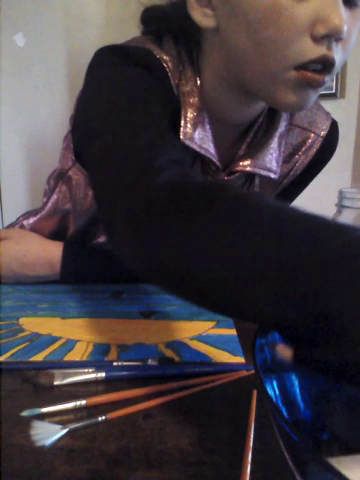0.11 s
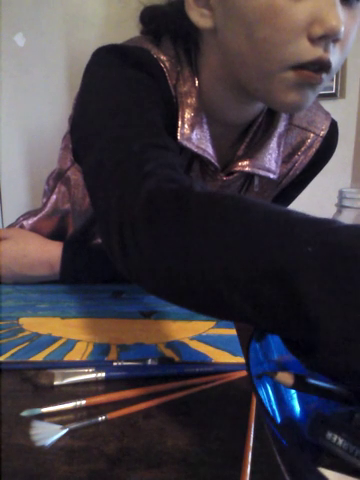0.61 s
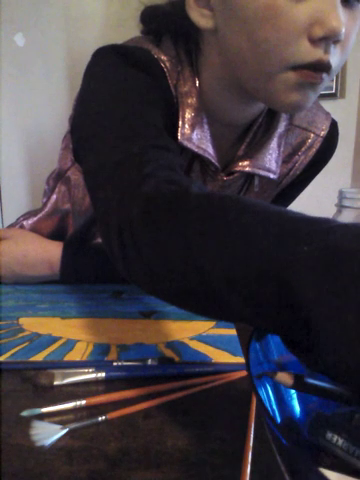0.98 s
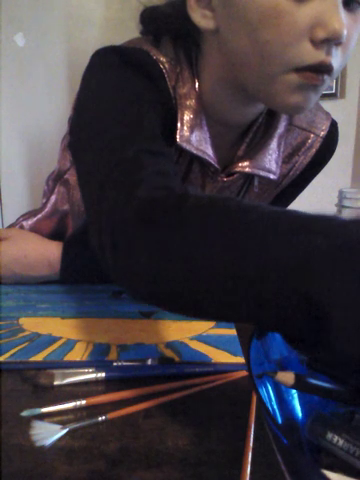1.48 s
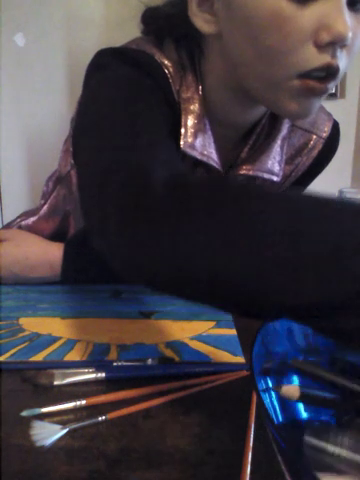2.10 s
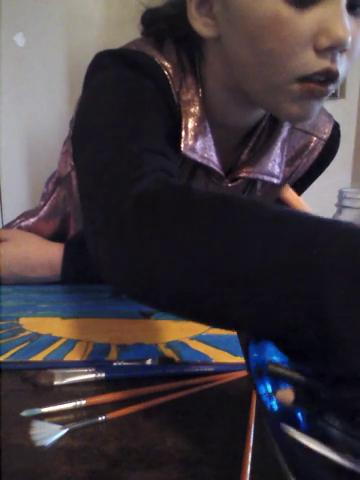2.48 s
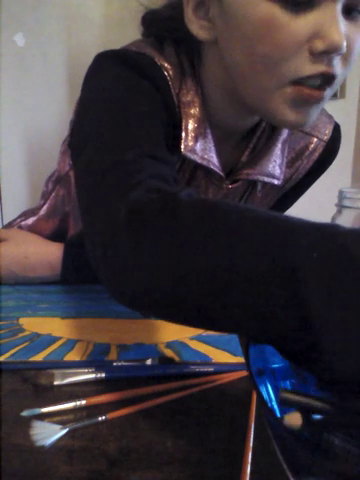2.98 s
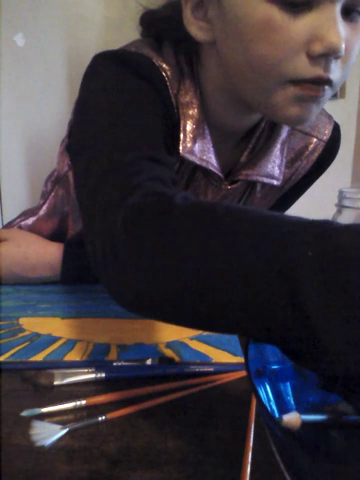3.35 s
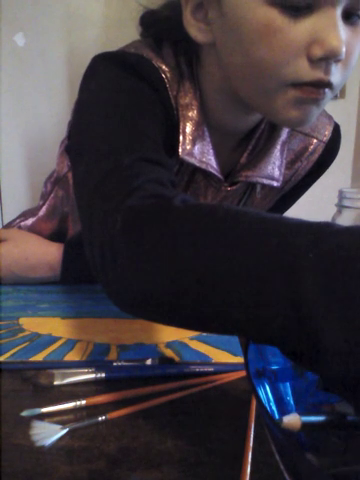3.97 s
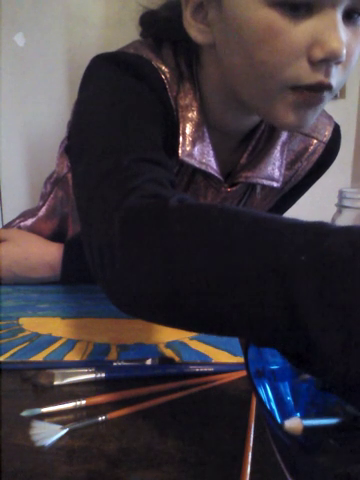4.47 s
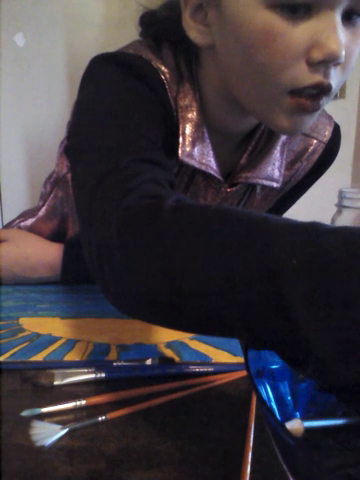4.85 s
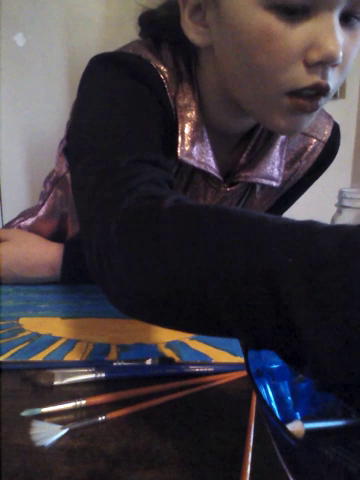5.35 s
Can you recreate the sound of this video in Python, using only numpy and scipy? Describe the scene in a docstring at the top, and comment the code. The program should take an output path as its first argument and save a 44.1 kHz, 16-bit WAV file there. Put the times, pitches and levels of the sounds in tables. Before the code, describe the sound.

A hand rummages through paintbrushes in a plastic case on a table, handles rattling and clacking, then thinning to scattered taps.

```python
"""Paintbrush handles clack, roll and scrape as a hand rummages through a plastic case on a wooden table.
Each impact excites the bending modes of the handles and the resonances of the hollow case;
now and then a single brush rings as a free bar. The case is shoved over the table, an arm bumps softly
on it and a sleeve slides past, all close to a small microphone in a quiet room."""
import sys
import numpy as np
from scipy import signal
from scipy.fft import rfft, irfft, next_fast_len
from scipy.io import wavfile
from scipy.ndimage import uniform_filter1d, map_coordinates

SR = 44100
rng = np.random.default_rng(int(sys.argv[2]) if len(sys.argv) > 2 else 0)


def to_wav(sig):
    """Store sig (one row per channel, or 1-D mono) as 16-bit WAV at the path in sys.argv[1].

    Samples outside -1..1 are clipped; the rate is SR.
    """
    pcm = np.clip(np.atleast_2d(sig), -1, 1) * 32767
    pcm = np.round(pcm).astype(np.int16)
    wavfile.write(sys.argv[1], SR, pcm.T)  # frames by channels


N = 244755

# handles striking the case: t/s, level/dB, hardness (-3 soft, 0 ordinary, 5 sharp)
HANDLE_IMPACTS = [(.031, -22, 0.7), (0.045, -27.5, 0), (.078, -23, -.5), (.114, -20.5, 3),
                  (.289, -19.5, -3.5), (.307, -19.5, 1), (.34, -23.5, 3), (0.358, -22, 0),
                  (0.38, -18, -1.1), (.459, -15, 1), (.468, -21, -0.5), (.541, -25, -.5), (.585, -29, -1),
                  (.705, -41, -1), (1.725, -42.5, 2.5), (1.815, -38, -1.5), (1.86, -38, -2),
                  (1.913, -18, -2), (1.929, -22, 1), (1.979, -21, -.5), (2.028, -21.5, 1.5),
                  (2.044, -17, 1), (2.072, -24, 2.5), (2.097, -18, -2), (2.12, -19.5, -2),
                  (2.177, -23.5, 4.5), (2.24, -20.5, 1), (2.279, -20.5, 1.5), (2.31, -25, 5),
                  (2.346, -20, 1.5), (2.445, -23, 1), (2.508, -16.5, 1), (2.603, -21.5, 0),
                  (2.651, -26.5, -0.5), (2.673, -20.5, 1), (2.836, -27, 1.5), (2.842, -16, 0),
                  (3.02, -38.5, -3), (3.12, -46, -1), (3.22, -49.5, -1), (3.256, -28, 0),
                  (3.441, -31.5, -.5), (3.481, -26, 1), (3.581, -47, -2.5), (4.09, -59.5, -0.5),
                  (4.11, -65.5, 0), (4.182, -29, 2.5), (4.246, -30, 4), (4.262, -24.5, 1), (4.27, -18, -.5),
                  (4.278, -22, 4), (4.357, -41, -1), (4.503, -58, 1.5), (4.618, -29, 2.2),
                  (4.867, -64.5, -1.5), (5.182, -63, 6.5), (5.325, -61.5, 5.5), (5.262, -50.5, -1.5),
                  (5.365, -47.5, 4), (5.463, -39, 1.5), (5.5, -43, -2.5), (5.522, -47.5, 2)]
# table knock, case body, wood snap, ferrule click: level/dB, gain per hardness step/dB, buzz time/s
IMPACT_BANDS = [(-10.5, -3.5, .012), (1.5, -0.56, .01), (-2, 0.5, 0.0091), (-12, 3, 0.0029)]
# edges of those four bands: f/Hz
IMPACT_BAND_EDGES = [95, 800, 2200, 5500, 18000]
# spectrum of handles on plastic: f/Hz, level/dB
CLATTER_SPECTRUM = [(50, -39.5), (125, -14.5), (250, -0.5), (370, -4.5), (520, 4), (800, -3.5), (1150, 2.5),
                    (1600, 5.5), (2900, -1.5), (4700, -11), (5900, -20.5), (7000, -13), (9000, -25),
                    (16000, -41.5)]
# resonances of the hollow case and table: f/Hz, level/dB
CASE_MODES = [(105, -7.5), (135, -3), (174, -23.5), (216, -18), (523, -9.5), (575, -2), (745, -29),
              (1060, 2), (1135, 1), (1447, -6.5), (1547, 7), (1700, 4), (2690, -12), (3000, -5.5),
              (3520, -7.5), (4822, -15)]
# strokes of the hand through the handles: t/s, duration/s, effort level/dB
HAND_STROKES = [(0, 0.015, -21.5), (.02, 0.026, -19.5), (.1, 0.11, -27), (.22, 0.052, -19.5),
                (.28, .12, -13.5), (.46, .05, -21.5), (1.72, 0.034, -30), (1.78, 0.024, -42.5),
                (1.898, 0.03, -33.5), (1.915, 0.035, -17.5), (2.01, 0.049, -17), (2.185, .18, -15.5),
                (2.44, .13, -22), (2.67, .04, -28.5), (2.74, .04, -33), (3.24, 0.032, -41),
                (3.425, 0.049, -33), (4.18, 0.0066, -21.5), (4.265, 0.014, -30), (4.45, 0.34, -67.5),
                (5.26, 0.17, -60), (5.44, 0.031, -43)]
# one handle ringing freely: t/s, peak level/dB, frequency ratio to BAR_MODES, tilt/(dB per octave)
HANDLE_PINGS = [(3.282, -26, 1, 2), (3.343, -16.5, 1, 2), (4.245, -11, 1.85, -12)]
# bending modes of that handle: f/Hz, level/dB, T60/s
BAR_MODES = [(2500, 6.5, 0.042), (4640, 2, 0.036), (5390, -8, 0.026), (7200, 1.5, 0.023)]
# soft bumps on case and table: t/s, peak level/dB, f/Hz
SOFT_BUMPS = [(0.332, -3, 514.5), (2.177, -2, 922), (2.324, -19, 131), (2.565, -9, 193), (2.584, -12, 228),
              (2.61, -10, 192.3), (2.943, -19, 514), (3.017, -27.5, 204), (3.407, -15.5, 528),
              (4.68, -43.5, 272.3), (4.945, -44.5, 186.2), (5.441, -32, 604)]
# the case dragging on the table: t/s, duration/s, level/dB
CASE_SHOVES = [(2.24, 0.079, -22.5)]
# spectrum of that drag: f/Hz, level/dB
DRAG_SPECTRUM = [(20, -8.5), (42, -1.5), (60, -8), (105, 3), (140, -1.5), (300, 2.5), (700, -46.5),
                 (2000, -120)]
# the sleeve sliding: t/s, duration/s, level/dB
SLEEVE_SLIDES = [(2.79, .27, -32.5)]
# spectrum of rubbing cloth: f/Hz, level/dB
CLOTH_SPECTRUM = [(59, -27), (100, -14), (135, 0.5), (255, 4.5), (398, -5), (547, -15), (705, -6.5),
                  (1760, -11), (2580, -16), (6150, -16.5), (6990, -3), (16000, -39)]
# reverberation time of the room: f/Hz, T60/s
ROOM_DECAY = [(120, 0.26), (400, 0.27), (2000, 0.17), (12000, 0.14)]
# still room and microphone hiss: f/Hz, level/dB
AIR_SPECTRUM = [(25, -2), (90, -2), (345, -6.5), (680, -7), (1140, -11.5), (5600, -18.5), (6950, -11.5),
                (8500, -16), (16000, -21.5)]


def clacks():
    """Impact excitation: a soft blow favours the low table knock, a hard one the snap and click."""
    out, t = np.zeros(N), np.arange(SR // 7) / SR
    edges = zip(IMPACT_BAND_EDGES, IMPACT_BAND_EDGES[1:])
    bands = [signal.butter(4, pair, "band", fs=SR, output="sos") for pair in edges]
    attack = round(.025 * SR)  # the first 25 ms set each band's level
    for start, db, hardness in HANDLE_IMPACTS:
        for band, (band_db, step_db, buzz_s) in zip(bands, IMPACT_BANDS):
            part = signal.sosfilt(band, impact(t, buzz_s))
            add(out, start, amp(db + band_db + step_db * hardness) * part / np.std(part[:attack]))
    return out


def impact(t, buzz_s, rise_s=0.0019, handle_t60=0.019, handle_db=-3, case_db=-9, chatter_db=-23):
    """Transient response: the handles buzz together, their modes die quickly and the case rings on."""
    chatter = amp(chatter_db) * fade(t, t60=.2)
    crack = rng.standard_normal(len(t)) * (np.exp(-(t / buzz_s) ** 2) + chatter)
    wood = ring(handle_modes(handle_t60) + handle_modes(handle_t60), t, scatter_db=3)  # two handles
    blow = shaped(crack / np.linalg.norm(crack) + amp(handle_db) * wood, CLATTER_SPECTRUM)
    onset = 1 - np.exp(-t / rise_s)  # the blow spreads through the bunch
    return (blow / np.linalg.norm(blow) + amp(case_db) * case_ring(t)) * onset


def handle_modes(t60):
    """Bending of a free bar: frequencies go as (2k + 1) squared, from a pitch set by its random length."""
    first_hz = rng.uniform(300, 800)
    return [(first_hz * ((2 * k + 1) / 3) ** 2, 0, t60) for k in range(1, 7)]


def case_ring(t, low_t60=0.1, damping_exponent=0.043, grip_detune=.012):
    """Damped resonance: the case's higher modes die sooner; the changing grip detunes them a little."""
    lowest_hz = CASE_MODES[0][0]
    modes = [(hz * (1 + grip_detune * rng.standard_normal()), db,
              low_t60 * (lowest_hz / hz) ** damping_exponent) for hz, db in CASE_MODES]
    return ring(modes, t, scatter_db=5.5)


def stirring(effort, case_db=-8, clump_db=2, clumps_per_s=130, tick_db=-23):
    """Sliding friction: handles slip in clumps of tiny contacts that shake the case; ferrules tick."""
    contacts = grains(per_s=5000, spread_db=2.5)
    clumping = amp(clump_db * wobble(clumps_per_s * N / SR, N))
    slips = unit(contacts * clumping) * effort
    scrape = shifting_colour(shaped(slips, CLATTER_SPECTRUM), depth_db=2.5) * np.std(slips)
    case = signal.fftconvolve(slips, case_ring(np.arange(SR // 3) / SR))[:N]
    t = np.arange(SR // 50) / SR
    taps = grains(per_s=90, spread_db=2)
    click = rng.standard_normal(len(t)) * fade(t, t60=.012)
    ticks = signal.fftconvolve(taps, click)[:N]
    ticks = shaped(ticks, [(1500, -21.0), (4500, 1.5), (7500, 2.5), (15000, -21)]) * effort
    return scrape + amp(case_db) * case + amp(tick_db) * ticks


def shifting_colour(x, depth_db):
    """Spectral modulation: the colour keeps changing as different handles touch."""
    spectra = signal.stft(x, nperseg=256)[2]
    field = uniform_filter1d(rng.standard_normal(spectra.shape), size=5, axis=0)  # smooth in frequency
    field = uniform_filter1d(field, size=6, axis=1)  # and in time
    return signal.istft(spectra * amp(depth_db * unit(field)), nperseg=256)[1][:N]


def pings(crack_db=-11, crack_t60=0.066, rise_s=0.0013):
    """Free vibration: a tapped handle buzzes against its neighbours and rings like a small bar."""
    out, t = np.zeros(N), np.arange(SR // 5) / SR
    for start, db, ratio, tilt in HANDLE_PINGS:
        crack = shaped(rng.standard_normal(len(t)) * fade(t, crack_t60), CLATTER_SPECTRUM)
        modes = [(ratio * hz, mode_db + tilt * np.log2(hz / BAR_MODES[0][0]), t60)
                 for hz, mode_db, t60 in BAR_MODES]
        bar = unit(ring(modes, t, scatter_db=2))
        ping = (bar + amp(crack_db) * crack) * (1 - np.exp(-t / rise_s))
        add(out, start, amp(db) * ping / np.abs(ping).max())
    return out


def bumps(rise_cycles=2.0, t60_cycles=6.6, overtone_ratio=1.8, overtone_db=-13):
    """Compliant impact: a soft contact builds up gradually and leaves a dull, heavily damped note."""
    out, t = np.zeros(N), np.arange(SR // 5) / SR
    for start, db, hz in SOFT_BUMPS:
        note = np.sin(2 * np.pi * hz * t) + amp(overtone_db) * np.sin(2 * np.pi * overtone_ratio * hz * t)
        onset = 1 - np.exp(-(t * hz / rise_cycles) ** 2)
        bump = note * fade(t, t60_cycles / hz) * onset
        add(out, start, amp(db) * bump / np.abs(bump).max())
    return out


def case_drag():
    """Stick-slip friction: the shoved case judders over the wood."""
    motion = strokes(CASE_SHOVES, rise_share=0.29, settle_db_per_s=248)
    return motion * shaped(grains(per_s=260, spread_db=2.0), DRAG_SPECTRUM)


def sleeve():
    """Friction noise: the dense contacts of sliding fibres merge into a hiss."""
    motion = strokes(SLEEVE_SLIDES, rise_share=0.29, settle_db_per_s=273)
    return motion * shaped(grains(per_s=6200, spread_db=5), CLOTH_SPECTRUM)


def after_ring(x, centre_hz=6950, half_width_hz=750, t60=0.97):
    """Narrow-band decay: a faint high ring hangs on behind the sound."""
    t = np.arange(SR) / SR
    tail = rng.standard_normal(SR) * fade(t, t60)
    tail = colour(tail / np.linalg.norm(tail), lambda hz: 1 / (1 + ((hz - centre_hz) / half_width_hz) ** 2))
    return signal.fftconvolve(x, tail)[:N]


def room(x, delay_s=0.0053):
    """Reverberation: the small room's diffuse reflections decay at a rate that depends on frequency."""
    hz, t, spectra = signal.stft(rng.standard_normal(SR), SR, nperseg=256)
    tail = signal.istft(spectra * fade(t, along(ROOM_DECAY, hz)[:, None]), SR, nperseg=256)[1]
    response = np.pad(tail / np.linalg.norm(tail), (round(delay_s * SR), 0))
    return signal.fftconvolve(x, response)[:N]


def air(level_db=-73):
    """Noise floor: the still room and the microphone give a steady broadband hiss."""
    return amp(level_db) * shaped(rng.standard_normal(N), AIR_SPECTRUM)


def strokes(rows, rise_share, settle_db_per_s):
    """Amplitude envelope: each move gathers speed, holds it and decays once the hand stops."""
    now, gain = np.arange(N) / SR, np.zeros(N)
    for start, length, db in rows:
        speed = np.clip((now - start) / (rise_share * length), 0, 1) ** 2
        since_stop = np.maximum(now - start - length, 0)
        gain = np.maximum(gain, speed * amp(db - settle_db_per_s * since_stop))
    return gain


def ring(modes, t, scatter_db):
    """Modal superposition at unit energy: strengths and signs are random, as the striking point varies."""
    hz, db, t60 = np.transpose(modes)[:, :, None]
    size = amp(db + scatter_db * rng.standard_normal(hz.shape)) * rng.choice([-1, 1], hz.shape)
    y = np.sum(size * np.sin(2 * np.pi * hz * t) * fade(t, t60), axis=0)
    return y / np.linalg.norm(y)


def grains(per_s, spread_db):
    """Shot noise: tiny contacts of uneven size at random times."""
    hits = rng.random(N) < per_s / SR
    return hits * rng.standard_normal(N) * amp(spread_db * rng.standard_normal(N))


def wobble(knots, size):
    """Spline interpolation: a smooth curve through random knots."""
    return map_coordinates(rng.standard_normal(int(knots) + 4), [np.linspace(0, knots, size)])


def shaped(x, spectrum):
    """Spectral shaping by (f/Hz, level/dB) points, at unit rms."""
    return unit(colour(x, lambda hz: amp(along(spectrum, hz))))


def colour(x, gain):
    """Minimum-phase filter: folding the cepstrum makes the magnitude gain(f) causal."""
    m = 2 * next_fast_len(len(x) // 2 + 2048)
    magnitude = np.maximum(gain(np.fft.rfftfreq(m, 1 / SR)), 1e-6)
    cepstrum = irfft(np.log(magnitude), m)
    cepstrum[1:m // 2] *= 2
    cepstrum[m // 2 + 1:] = 0
    return irfft(rfft(x, m) * np.exp(rfft(cepstrum)), m)[:len(x)]


def along(points, hz):
    """Interpolation of (f/Hz, value) points on a logarithmic axis."""
    f, values = np.transpose(points)
    return np.interp(np.log(hz + 1), np.log(f + 1), values)


def fade(t, t60):
    """Exponential decay by 60 dB in t60 seconds."""
    return np.exp(-np.log(1000) * t / np.maximum(t60, 1e-3))


def amp(db):
    """Amplitude ratio of a level in decibels."""
    return 10 ** (np.asarray(db) / 20)


def unit(x):
    """Normalisation to unit rms."""
    return x / np.sqrt(np.mean(x ** 2) + 1e-20)


def add(track, start_s, sound):
    """Superposition of a sound on the track from start_s onward."""
    start = max(round(start_s * SR), 0)
    track[start:start + len(sound)] += sound[:max(N - start, 0)]


def scene():
    """Direct and reverberant fields add: every source lies within arm's reach in one small room."""
    effort = strokes(HAND_STROKES, rise_share=0.26, settle_db_per_s=211)
    rummage = stirring(effort)
    background = air()
    direct = clacks() + rummage + pings() + bumps() + case_drag() + sleeve()
    return (direct + amp(-9.5) * room(direct) + amp(-9.5) * after_ring(rummage) + background)[None]


def record(dry, top_hz=15800):
    """Soft saturation and band limiting: the microphone rounds peaks and passes nothing above top_hz."""
    rounded = dry / (1 + np.abs(dry) ** 6) ** (1 / 6)
    m = next_fast_len(N + SR // 2)
    passband = np.fft.rfftfreq(m, 1 / SR) < top_hz
    return irfft(rfft(rounded, m) * passband, m)[..., :N]


dry = scene()
out = record(dry)
to_wav(out)
```